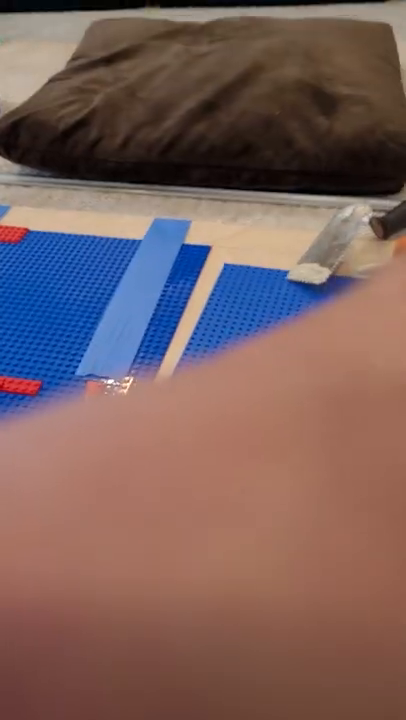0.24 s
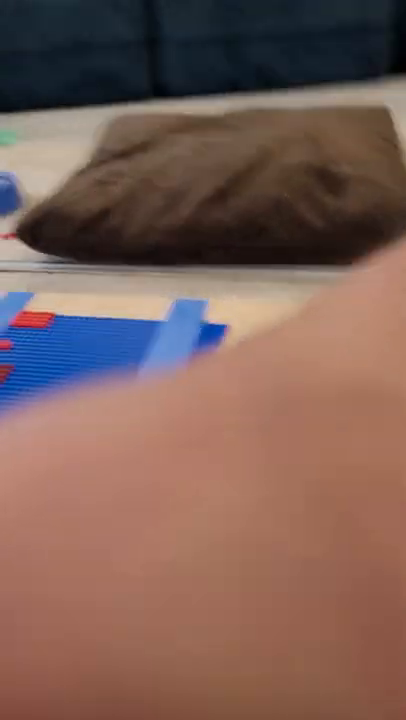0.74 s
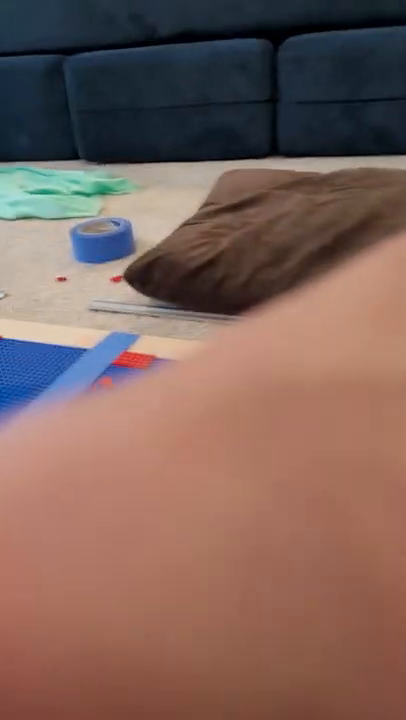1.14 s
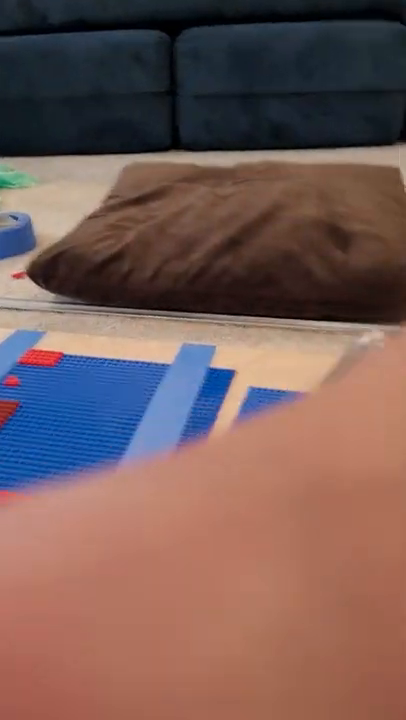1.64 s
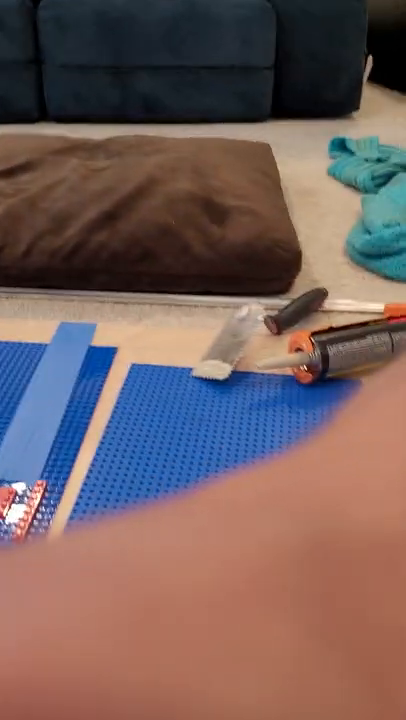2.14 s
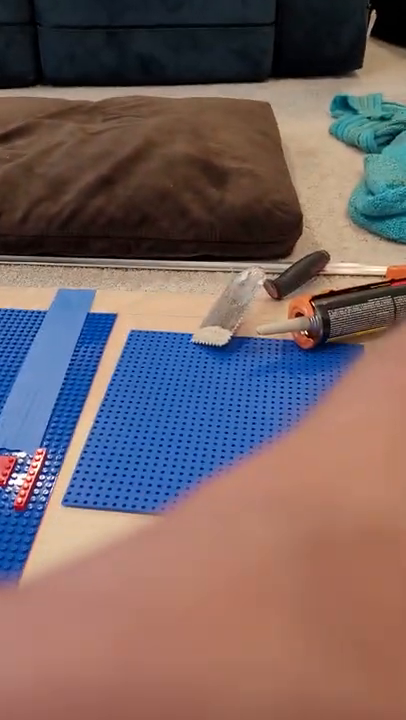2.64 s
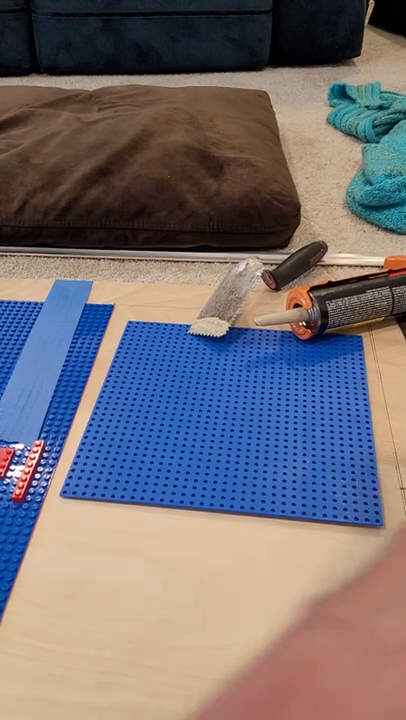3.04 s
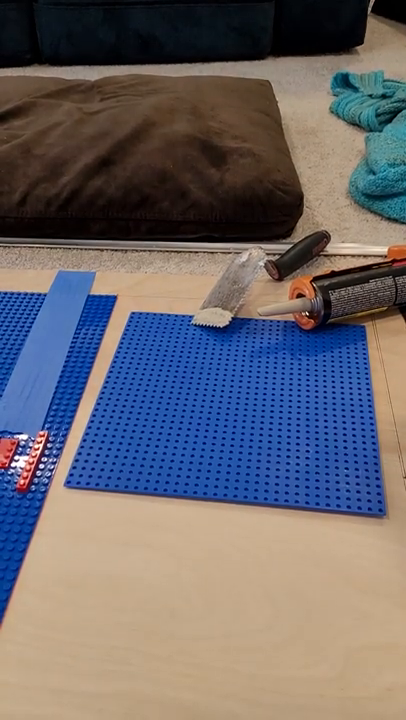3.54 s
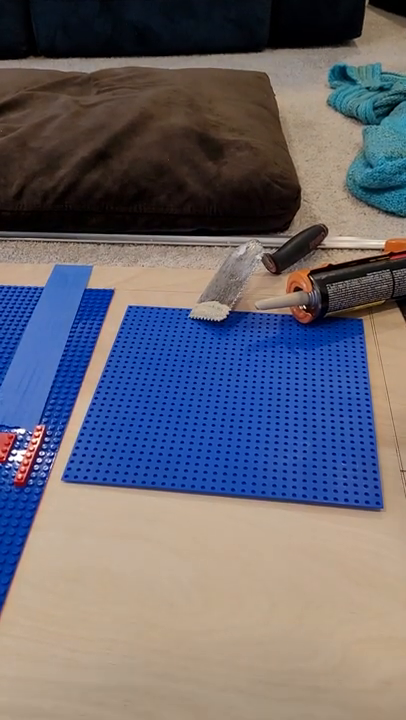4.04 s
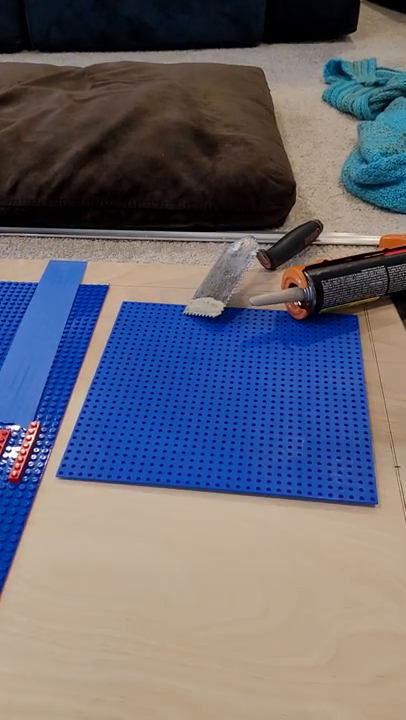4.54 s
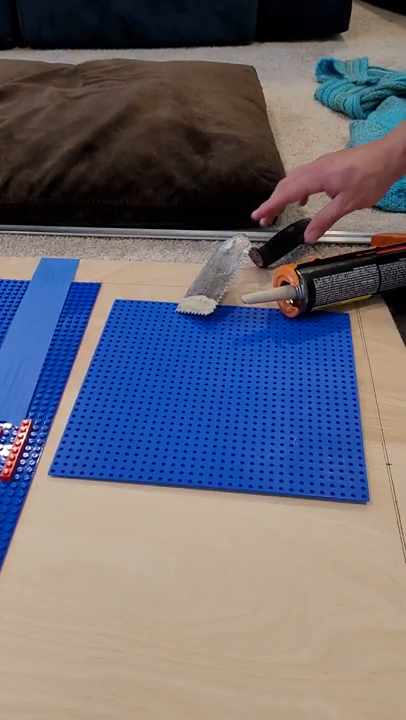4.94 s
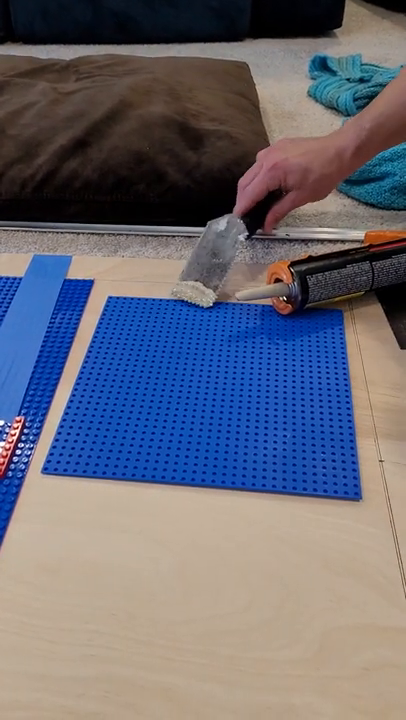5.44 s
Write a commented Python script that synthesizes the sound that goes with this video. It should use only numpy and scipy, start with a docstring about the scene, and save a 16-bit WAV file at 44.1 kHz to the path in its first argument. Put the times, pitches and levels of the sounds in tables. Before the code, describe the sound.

Fingers rub, bump and click against a handheld phone over a low indoor hum, then a putty knife scrapes softly.

```python
"""A phone is shifted in the hand above a workboard with tools, in a carpeted room; an air handler hums.
From the start, fingers rub and bump the case beside the right microphone port; handled things tick lightly.
The case edge snaps at 0.6 s and a fingertip squeaks at 1.1 s. From 1.6 s the grip slips in a
ratcheting run of clicks, then the hand slides away with a faint hiss.
At 5 s a putty knife scrapes softly off the board."""
import sys
import numpy as np
from scipy import signal
from scipy.fft import rfft, irfft, next_fast_len
from scipy.io import wavfile
from scipy.ndimage import uniform_filter1d

SR = 44100
rng = np.random.default_rng(int(sys.argv[2]) if len(sys.argv) > 2 else 0)


def file_out(sig):
    """Save sig as 16-bit WAV at sys.argv[1]."""
    # one column per channel
    cols = np.atleast_2d(sig).T
    # limit, then scale
    lim = np.clip(cols, -1, 1)
    pcm = np.round(lim * 32767).astype(np.int16)
    wavfile.write(sys.argv[1], SR, pcm)


N = 250929
TIME = np.arange(N) / SR
HIT_TIME = TIME[:SR // 8]
CREEP_RELEASE_DB_PER_S = 194

# Spectrum of a hard contact: freq_hz, gain_db
CRACK_SPECTRUM = [(300, -18.5), (700, -2), (1080, 7.5), (1450, -0.5), (2250, 1), (3100, -5.5), (3900, -8.5),
                  (4900, -9.5), (6200, -16), (8000, -24), (16000, -46)]
# Spectrum of fine surface grains: freq_hz, gain_db
FIZZ_SPECTRUM = [(2500, -29), (5000, -9), (6300, -9), (8200, -8), (9600, -2.5), (11000, 4), (13000, 0.5),
                 (15000, -1), (16500, -11)]


def undb(db):
    """Decibels to gain."""
    return 10 ** (np.asarray(db) / 20)


def pan(left_db):
    """Stereo gains: left at left_db, right at unity."""
    return undb([[left_db], [0]])


def unit(x):
    """Scale to rms 1."""
    return x / np.sqrt(np.mean(x ** 2))


def at_level(x, db):
    """Scale a hit so its loudest 4 ms have this rms level."""
    power = uniform_filter1d(x ** 2, size=SR // 250, mode="constant")
    return x * undb(db) / np.sqrt(power.max())


def decay(time_s, t60_s):
    """Envelope falling 60 dB in t60_s."""
    return undb(-60 * time_s / t60_s)


def on_bins(points, size):
    """Interpolate (freq_hz, value) points onto FFT bins, in log frequency."""
    hz, value = np.transpose(points)
    return np.interp(np.log(np.fft.rfftfreq(size, 1 / SR) + 1), np.log(hz), value)


def colour(x, spectrum):
    """Minimum-phase filter through (freq_hz, gain_db) points."""
    size = next_fast_len(len(x)) * 2
    cepstrum = irfft(np.log(undb(on_bins(spectrum, size))))
    cepstrum[1:size // 2] *= 2
    cepstrum[size // 2 + 1:] = 0
    return irfft(rfft(x, size) * np.exp(rfft(cepstrum)))[:len(x)]


def wander(rate_hz):
    """Smooth random motion, rms 1."""
    span = int(SR / rate_hz)
    steps = np.repeat(rng.standard_normal(N // span + 2), span)
    return unit(uniform_filter1d(uniform_filter1d(steps, span), span)[:N])


def add(out, start_s, sound):
    """Mix in a stereo sound."""
    i = max(int(start_s * SR), 0)
    out[:, i:i + sound.shape[1]] += sound[:, :N - i]


def air_handler(duct_db=-49, waver_db=2.5, drift_rad=0.86):
    """Wavering motor lines over duct rumble; the bass is alike at both ports."""
    # Motor lines, the close pair beating: pitch_hz, level_db (before the rise)
    motor_lines = [(58.2, -46), (113.6, -46.5), (120, -42), (221, -59), (619, -67)]
    # Duct noise spectrum: freq_hz, gain_db
    duct_spectrum = [(30, -19), (58, 0.5), (75, 2), (100, -13), (135, -5.5), (225, -11.5), (400, -22),
                     (620, -26.5), (900, -38), (1400, -48.5), (3000, -55), (7000, -66), (12000, -62.5),
                     (16000, -61.5)]
    # Duct noise likeness between ports: freq_hz, coherence
    port_coherence = [(60, .93), (130, 0.98), (290, 0.85), (640, 0.53), (1400, 0), (16000, 0.065)]
    # Room sound rises as the hand moves on the phone: time_s, gain_db
    rise = [(.5, -8), (1.1, -6), (1.6, -1)]
    gain, coherence = undb(on_bins(duct_spectrum, N)), on_bins(port_coherence, N)
    mid, side = (irfft(rfft(rng.standard_normal(N)) * gain * np.sqrt(1 + sign * coherence), N)
                 for sign in (1, -1))
    above_hum = signal.sosfilt(signal.butter(6, 150, "high", fs=SR, output="sos"), mid)
    duct = np.array([mid + side, mid - side]) * undb(duct_db) / above_hum.std()
    hum = np.zeros(N)
    for hz, db in motor_lines:
        waver = undb(waver_db * wander(14))
        phase = 2 * np.pi * hz * TIME + drift_rad * wander(11)
        hum += undb(db) * unit(waver * np.sin(phase))
    return (duct + hum * pan(left_db=-2.5)) * undb(np.interp(TIME, *np.transpose(rise)))


def stroke(start_s, end_s, swell_db_per_s, release_db_per_s, onset_db_per_s=1500):
    """Gain of a sliding contact: takes hold, swells to 1 at end_s, dies away."""
    early_s, to_go_s, after_s = np.maximum([start_s - TIME, end_s - TIME, TIME - end_s], 0)
    return undb(-onset_db_per_s * early_s - swell_db_per_s * to_go_s - release_db_per_s * after_s)


def friction(spectrum, grain_db):
    """Dense, uneven grains, independent at the two ports."""
    noise = rng.standard_normal((2, N))
    grain_size = np.minimum(rng.exponential(size=(2, N)), 6)
    return np.array([unit(colour(port, spectrum)) for port in noise * undb(grain_db * grain_size)])


def rub(swell_db_per_s=170, stop_db_per_s=749, settle_db_per_s=220, settle_db=-14.5, flutter_db=2.58):
    """Skin creeps on the case as the hold shifts; single fingers slide, stop and settle."""
    # Hand creeping over the case: start_s, end_s
    hold_shifts = [(0.115, 0.786), (0.97, 1.9), (2.0, 2.63)]
    # Finger slides: start_s, end_s, rasp_db, fizz_db
    slides = [(0, 0.032, -58.5, -82), (0.123, 0.205, -51.5, -53.5), (0.407, 0.46, -50, -61),
              (0.637, 0.655, -40, -56), (0.676, 0.677, -52, -41), (0.98, 1.053, -63, -54),
              (1.078, 1.098, -32, -62), (1.12, 1.125, -54, -57), (1.84, 1.85, -64, -62),
              (2.01, 2.045, -55.5, -70), (2.125, 2.143, -41.5, -42.5), (2.16, 2.207, -55.5, -64),
              (2.36, 2.41, -59.5, -69)]
    # Spectrum of sliding skin: freq_hz, gain_db
    rasp_spectrum = [(200, -10), (500, 6), (1000, 4.5), (1500, -1.5), (2200, -3), (4000, -5.5),
                     (5800, -9.5), (8000, -20), (16000, -42)]
    creep = sum(stroke(start_s, end_s, 0, CREEP_RELEASE_DB_PER_S) for start_s, end_s in hold_shifts)
    rasp_gain, fizz_gain = undb(-66) * creep, undb(-75.5) * creep
    for start_s, end_s, rasp_db, fizz_db in slides:
        moving = stroke(start_s, end_s, swell_db_per_s, stop_db_per_s)
        settling = undb(settle_db) * stroke(start_s, end_s, swell_db_per_s, settle_db_per_s)
        slide = np.maximum(moving, settling)
        rasp_gain = np.hypot(rasp_gain, undb(rasp_db) * slide)
        fizz_gain = np.hypot(fizz_gain, undb(fizz_db) * slide)
    rasp = friction(rasp_spectrum, grain_db=4) * rasp_gain * undb(flutter_db * wander(120))
    fizz = friction(FIZZ_SPECTRUM, grain_db=4) * fizz_gain * undb(flutter_db * wander(120))
    return rasp * pan(left_db=-13) + fizz * pan(left_db=-19)


def thump(modes, pitch_ratio, push_s, db):
    """A half-sine push rings the case modes."""
    time_s = HIT_TIME * pitch_ratio
    ring = sum(undb(gain_db) * np.cos(2 * np.pi * hz * time_s) * decay(time_s, t60_s)
               for hz, t60_s, gain_db in modes)
    push = np.sin(np.pi * np.minimum(HIT_TIME / push_s, 1))
    return at_level(signal.fftconvolve(ring, push)[:len(HIT_TIME)], db)


def rock(pitch_ratio, push_s, db, left_db):
    """The case rocks, moving the two ports in opposite senses."""
    # Case modes at the left port: pitch_hz, t60_s, gain_db
    left_modes = [(121, .07, -17.5), (290, 0.006, -12.5), (574.3, .019, 8), (720, 0.03, 1)]
    # Case modes at the right port: pitch_hz, t60_s, gain_db
    right_modes = [(122, 0.16, -15.5), (265, 0.021, 3.5), (370, 0.0047, 0.5), (520, 0.009, -22.5),
                   (1010, 0.014, -21.5)]
    return np.array([thump(left_modes, pitch_ratio, push_s, db + left_db),
                     -thump(right_modes, pitch_ratio, push_s, db)])


def grit(contact_s, spectrum, db, left_db, tilt_db_per_oct=0):
    """Surface grains shear off until contact ends; harder contact is brighter above 1 kHz."""
    fade = np.exp(-(HIT_TIME / contact_s) ** 1.3)
    tilted = [(hz, gain_db + tilt_db_per_oct * np.log2(max(hz, 1000))) for hz, gain_db in spectrum]
    bursts = fade * rng.standard_normal((2, len(HIT_TIME)))
    return np.array([at_level(colour(burst, tilted), db) for burst in bursts]) * pan(left_db)


def finger_bumps(push_s=0.0006, free_pitch_ratio=1.05, loading_s=0.016):
    """Fingers land with a thump and a short scrape; longer contact loads the case, lowering its pitch."""
    # Landings: start_s, thump_db, left_re_right_db, crack_db, fizz_db, contact_s, tilt_db_per_oct
    landings = [(0.0064, -26.5, -23, -30.5, -63, .0011, -3), (0.467, -7.5, -32, -18, -43, 0.0016, -5.5),
                (0.614, -29, -8, -30, -40, 0.0023, 10), (0.6318, -22.5, -10.5, -25.5, -30, 0.0065, 5.5),
                (0.6337, -18, -8.5, -26, -19, 0.0015, 9), (0.642, -29.5, -0.5, -30.5, -39, 0.0036, 5.5),
                (0.6817, -40.5, -1, -29, -37, 0.0028, 3.5), (0.707, -34, -14.5, -51, -68, 0.0043, 5),
                (1.0731, -16, -5.5, -18, -35.5, 0.002, 3), (1.1082, -14, -5, -23, -40.5, 0.0044, 1.5),
                (1.222, -33.5, -20, -51, -73, 0.0011, 2.5), (1.5016, -23, -6, -52.5, -67, 0.0038, 6),
                (2.0584, -16.5, -17, -34, -34, .011, 3.5), (2.1187, -20, -23, -38.5, -33, 0.012, -1),
                (2.361, -34, -6, -62, -78, 0.004, -10)]
    out = np.zeros((2, N))
    for start_s, thump_db, left_db, crack_db, fizz_db, contact_s, tilt_db_per_oct in landings:
        pitch_ratio = free_pitch_ratio / (1 + (contact_s / loading_s) ** 2)
        shade_db = 0.49 * (left_db + 3)  # a touch at one port barely reaches the other
        crack = grit(contact_s, CRACK_SPECTRUM, crack_db, shade_db - 11, tilt_db_per_oct)
        fizz = grit(contact_s, FIZZ_SPECTRUM, fizz_db, shade_db - 19)
        add(out, start_s, rock(pitch_ratio, push_s, thump_db, left_db) + crack + fizz)
    return out


def light_ticks(crack_left_db=-18, fizz_left_db=-21):
    """Light ticks and scuffs of handled things, some perhaps tools nearby."""
    # Ticks and scuffs: start_s, crack_db, fizz_db, contact_s, tilt_db_per_oct
    touches = [(0.1166, -52, -58, 0.002, 10), (0.2648, -39.5, -78, .0098, -4.5),
               (0.3042, -54, -55, 0.0015, -3), (0.3268, -44, -70, 0.0071, -5), (0.4512, -37, -60, .009, -7),
               (0.7698, -47.5, -43, 0.001, 0.5), (0.9698, -58, -56, 0.0024, -7),
               (1.031, -44, -50, 0.012, 1.5), (1.1767, -46, -74, 0.0012, 1), (1.2473, -50, -64, 0.026, 2),
               (2.0928, -49, -74, 0.0022, -9), (2.11, -55, -50, .001, -2), (2.4066, -52, -65, 0.0013, 20),
               (2.4425, -68, -55, .0008, -7), (2.6, -45.5, -48.5, 0.0028, 2.5)]
    out = np.zeros((2, N))
    for start_s, crack_db, fizz_db, contact_s, tilt_db_per_oct in touches:
        crack = grit(contact_s, CRACK_SPECTRUM, crack_db, crack_left_db, tilt_db_per_oct)
        fizz = grit(contact_s, FIZZ_SPECTRUM, fizz_db, fizz_left_db)
        add(out, start_s, crack + fizz)
    return out


def edge_snap(start_s=0.6338, level_db=-17, contact_s=0.00027):
    """The case edge snaps under a hard press and rings briefly."""
    # Hard plastic edge modes: pitch_hz, t60_s, gain_db
    edge_modes = [(2290, .016, -4), (2560, 0.0099, -8), (3240, .01, -11.5), (4560, .016, 1),
                  (4850, 0.0062, -3), (5270, .012, -0.5)]
    ring = sum(undb(db) * np.sin(2 * np.pi * (hz * HIT_TIME + rng.random())) * decay(HIT_TIME, t60_s)
               for hz, t60_s, db in edge_modes)
    attack = 1 - np.exp(-HIT_TIME / contact_s)
    out = np.zeros((2, N))
    add(out, start_s, at_level(ring * attack, level_db) * pan(left_db=-14))
    return out


def squeak(peak_s=1.096, width_s=0.0095, start_hz=900, end_hz=730, level_db=-33):
    """A fingertip skids between two bumps: a rough, falling tone."""
    glide_hz = np.interp(TIME, [peak_s - width_s, peak_s + width_s], [start_hz, end_hz])
    pitch_hz = glide_hz * (1 + 0.066 * wander(900))
    tone = np.sqrt(2) * np.sin(2 * np.pi * np.cumsum(pitch_hz) / SR)
    envelope = np.exp(-0.5 * ((TIME - peak_s) / width_s) ** 2)
    return tone * envelope * undb(level_db) * pan(left_db=-5)


def grip_slips(fizz_s=0.00087, crack_s=0.0019, push_s=0.0015):
    """Stick-slip: each release of the grip fizzes, cracks and rocks the case."""
    # Grip releases: start_s, thump_db, crack_db
    releases = [(1.5963, -25.5, -30.5), (1.6353, -20, -33.5), (1.6626, -17.5, -30.5), (1.6709, -21, -31.5),
                (1.6894, -20, -32.5), (1.6966, -20.5, -32.5), (1.7024, -16, -36.5), (1.7078, -24, -34),
                (1.7125, -30.5, -34), (1.7171, -23, -34), (1.722, -24, -34), (1.738, -16.5, -24),
                (1.7771, -17, -28.5), (1.784, -17, -33), (1.8016, -16.5, -23), (1.8251, -17, -21.5),
                (1.8416, -17.5, -23), (1.853, -35.5, -40.5), (1.9851, -38, -45.5), (1.9998, -24.5, -36.5)]
    # Spectrum of a release crack: freq_hz, gain_db
    release_spectrum = [(300, -10.5), (750, 7), (1080, 3), (1500, 1.5), (2300, 1), (3100, -5.5),
                        (4000, -8.5), (5200, -6), (6100, -22.5), (8000, -20.5), (16000, -46)]
    # Fizz relative to release strength, highest at first: time_s, gain_db
    fizz_trend = [(1.68, -4.5), (1.72, -8.5), (1.83, -16)]
    pitch_ratios = 1 + 0.05 * rng.standard_normal(len(releases))
    out = np.zeros((2, N))
    for (start_s, thump_db, crack_db), pitch_ratio in zip(releases, pitch_ratios):
        fizz_db = (thump_db + crack_db) / 2 + np.interp(start_s, *np.transpose(fizz_trend))
        far_ring_db = crack_db + 1.5  # the far side rings in step with the crack
        body = rock(pitch_ratio, push_s, thump_db, left_db=far_ring_db - thump_db)
        crack = grit(crack_s, release_spectrum, crack_db, left_db=-12)
        fizz = grit(fizz_s, FIZZ_SPECTRUM, fizz_db, left_db=-25)
        add(out, start_s, body + crack + fizz)
    return out


def parting_hiss(start_s=2.16, end_s=2.58, centre_hz=4200, half_width_hz=330, level_db=-73):
    """A faint, narrow hiss as the hand slides away."""
    resonance = 1 / (1 + 2j * (np.fft.rfftfreq(N, 1 / SR) - centre_hz) / half_width_hz)
    hiss = unit(irfft(rfft(rng.standard_normal(N)) * resonance, N))
    return hiss * stroke(start_s, end_s, 0, CREEP_RELEASE_DB_PER_S) * undb(level_db) * pan(left_db=-13)


def putty_knife(start_s=5.01, lift_s=5.29, scrape_db=-56, hiss_db=-75, left_db=3.5):
    """The blade is drawn off the board in one stroke, scraping, hissing and catching twice."""
    # Spectrum of the blade scrape: freq_hz, gain_db
    blade_spectrum = [(600, -11), (1200, -3.5), (1620, 4), (1850, -4), (2100, 2.5), (2430, 2), (2800, -4),
                      (3700, -9), (4900, -7.5), (7000, -20), (10500, -16), (16000, -23)]
    # Edge catches: start_s, level_db
    catches = [(5.223, -49), (5.283, -55)]
    onset_db_per_s, swell_db_per_s, release_db_per_s, catch_s = 250, 67.5, 145, 0.019
    scrape_gain = stroke(start_s, lift_s, swell_db_per_s, release_db_per_s, onset_db_per_s)
    hiss_gain = stroke(start_s, lift_s, 0, release_db_per_s, onset_db_per_s)
    scrape = friction(blade_spectrum, grain_db=3) * scrape_gain * undb(scrape_db + 1.5 * wander(70))
    hiss = friction(FIZZ_SPECTRUM, grain_db=4.5) * hiss_gain * undb(hiss_db)
    out = scrape * pan(left_db) + hiss * pan(left_db=6)
    for time_s, level_db in catches:
        add(out, time_s, grit(catch_s, blade_spectrum, level_db, left_db))
    return out


def room_tail(dry, t60_s=0.18, wet_db=-24):
    """Short, dull reverberation of the carpeted room."""
    # Room response: freq_hz, gain_db
    response = [(150, -18), (1000, -3), (2500, 0.5), (5000, 3.5), (9000, -14)]
    time_s = TIME[:3 * len(HIT_TIME)]
    tails = rng.standard_normal((2, len(time_s))) * decay(time_s, t60_s)
    source = colour(dry.sum(axis=0), response)
    wet = [signal.fftconvolve(source, tail / np.linalg.norm(tail))[:N] for tail in tails]
    return undb(wet_db) * np.array(wet)


def scene():
    """Handling sounds, their room tail, the putty knife and the air handler."""
    slips = grip_slips()
    bumps = finger_bumps() + edge_snap() + squeak()
    ticks = light_ticks()
    # slips and bumps on the case radiate little into the room; the ticks get more of its tail
    airborne = undb(-4) * slips + undb(-2.5) * bumps + undb(6.5) * ticks
    contacts = slips + bumps + ticks + room_tail(airborne)
    return contacts + rub() + putty_knife() + air_handler() + parting_hiss()


def record(dry):
    """The phone thins the deep bass, rounds the hardest peaks and cuts the top."""
    low_cut_hz, top_hz, ceiling = 35, 16200, 0.75
    thinned = signal.sosfilt(signal.butter(2, low_cut_hz, "high", fs=SR, output="sos"), dry)
    rounded = thinned / (1 + (thinned / ceiling) ** 4) ** 0.25
    return signal.sosfilt(signal.ellip(8, 0.2, 80, top_hz, fs=SR, output="sos"), rounded)


dry = scene()
out = record(dry)
file_out(out)
```